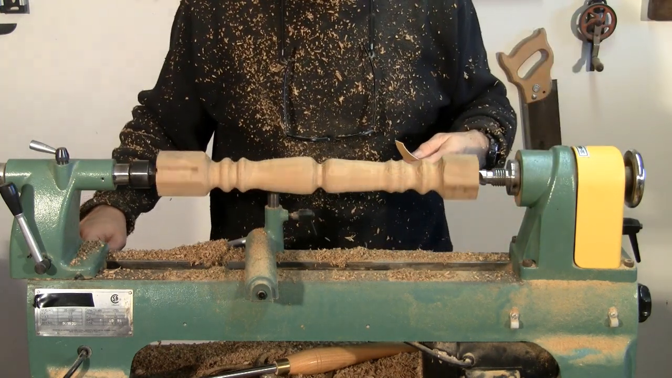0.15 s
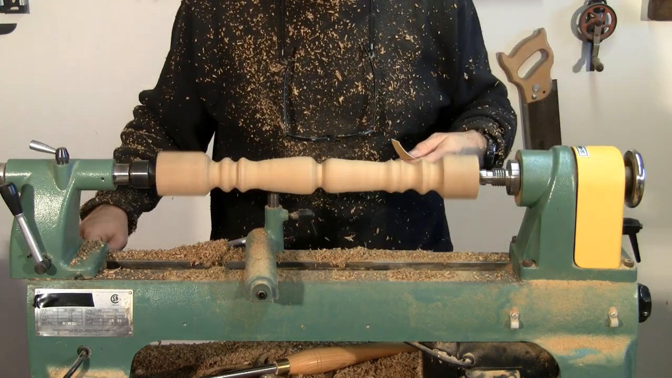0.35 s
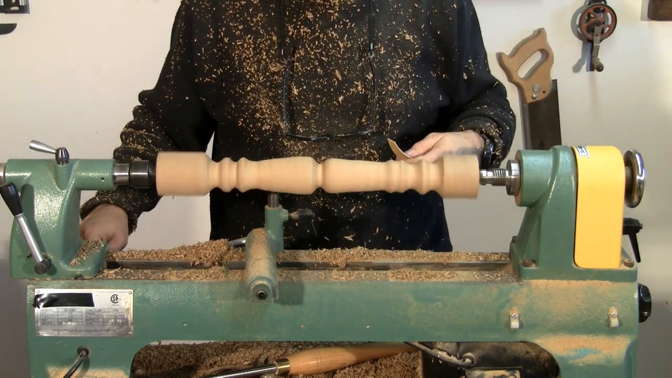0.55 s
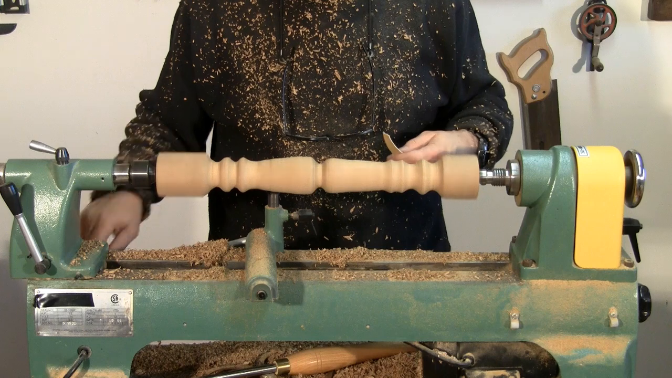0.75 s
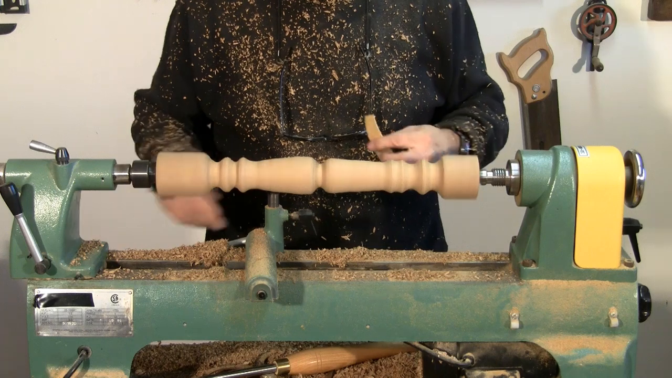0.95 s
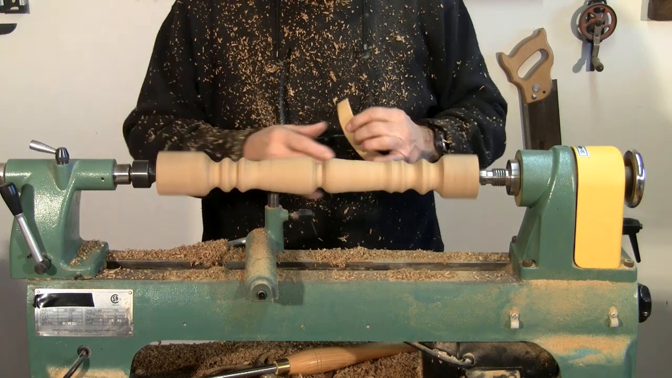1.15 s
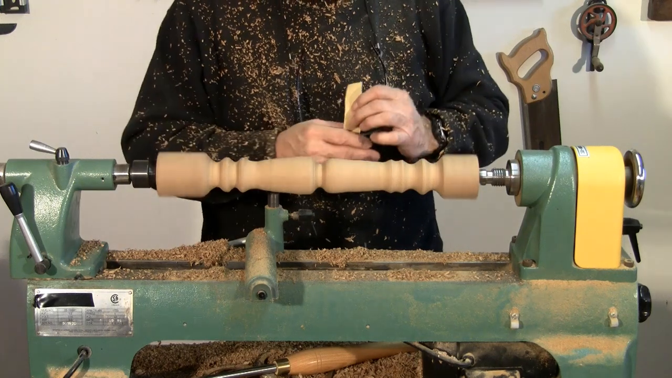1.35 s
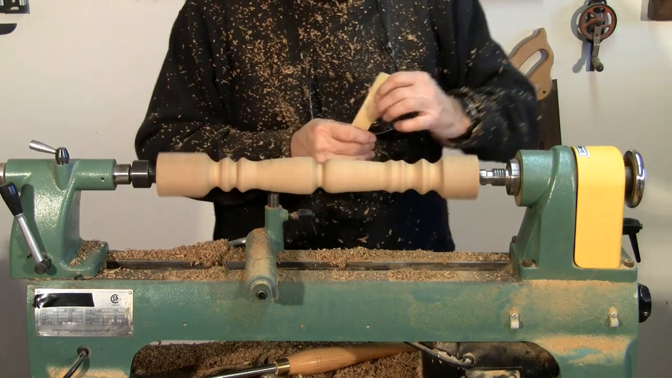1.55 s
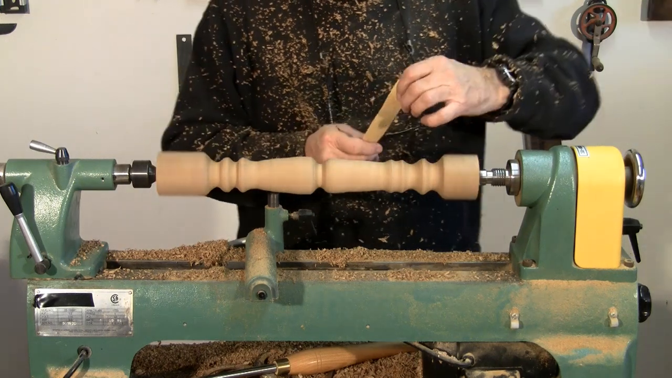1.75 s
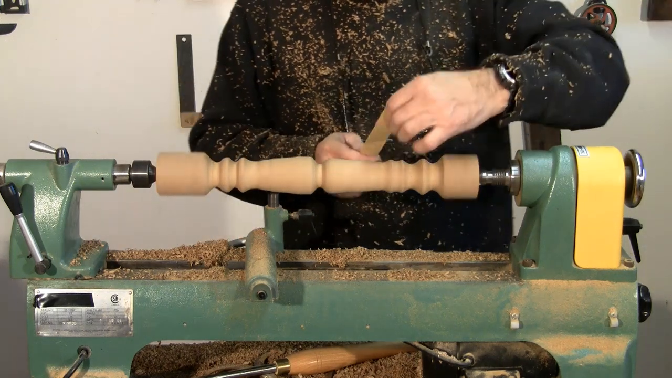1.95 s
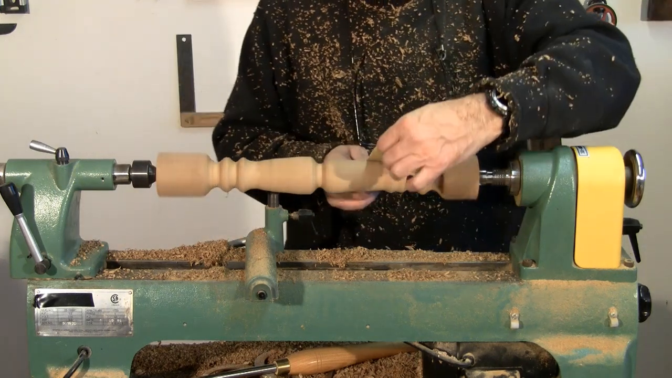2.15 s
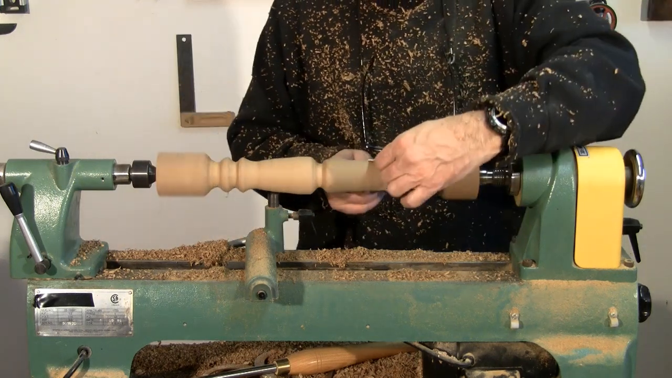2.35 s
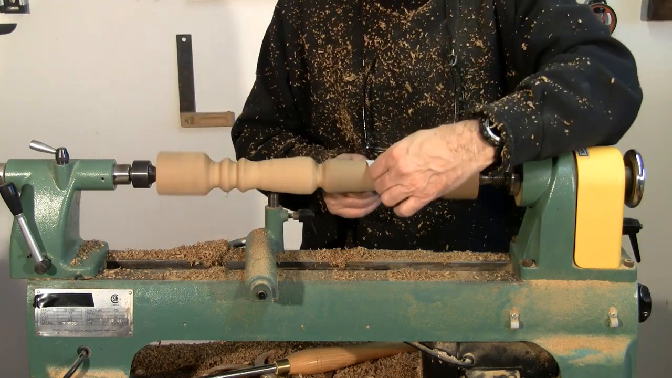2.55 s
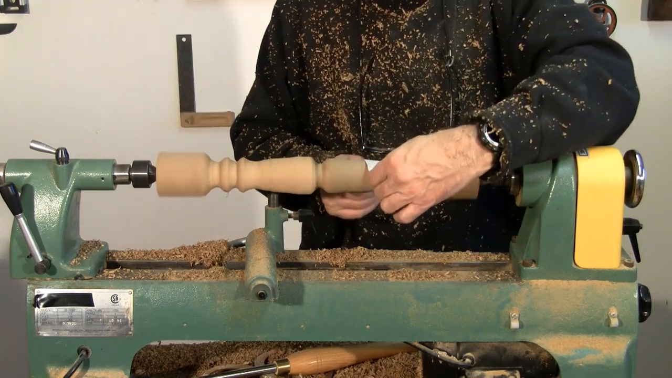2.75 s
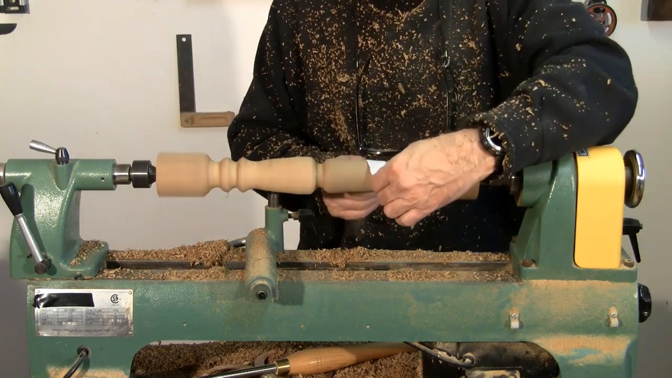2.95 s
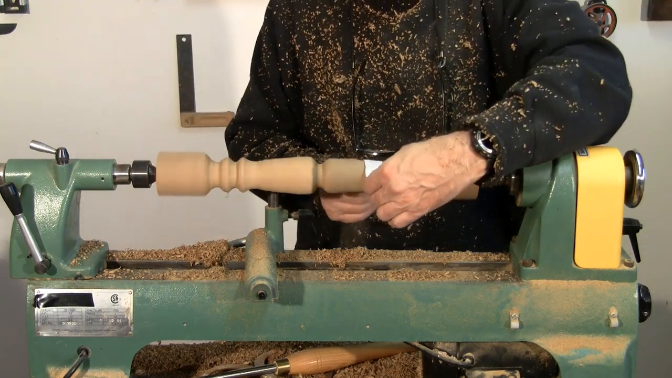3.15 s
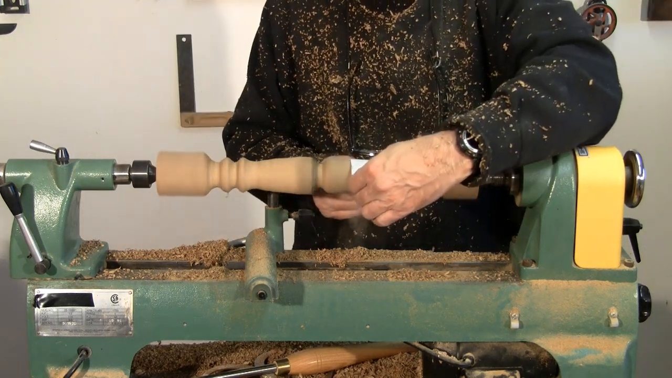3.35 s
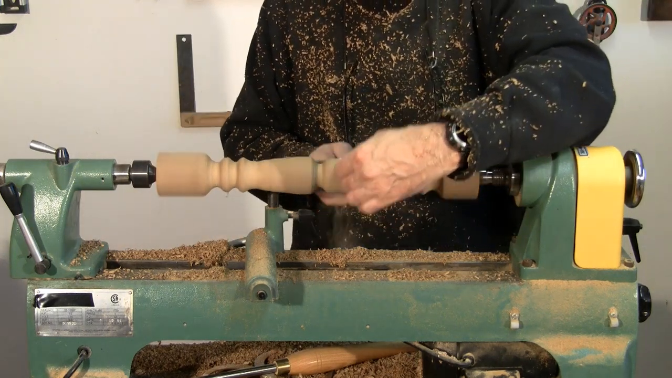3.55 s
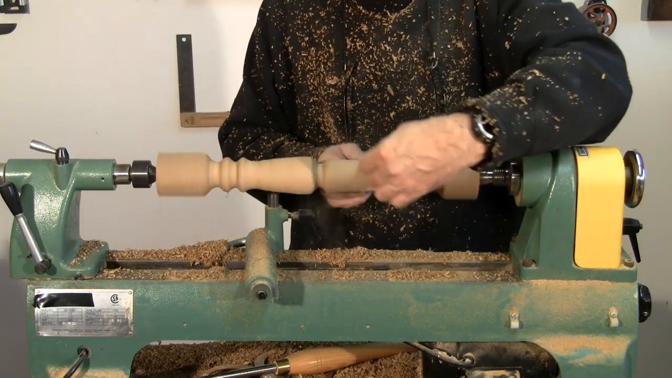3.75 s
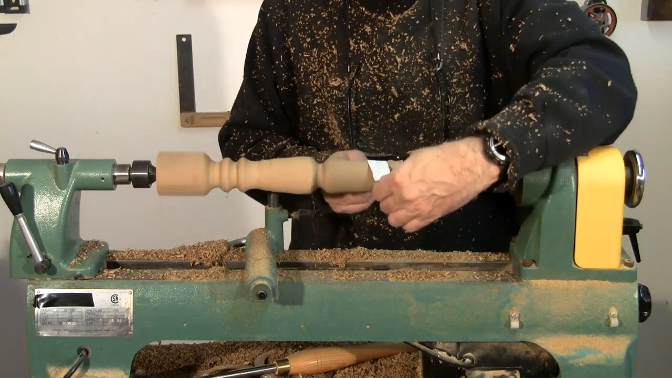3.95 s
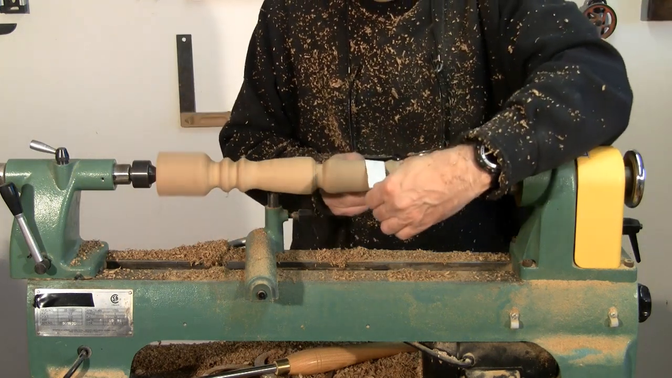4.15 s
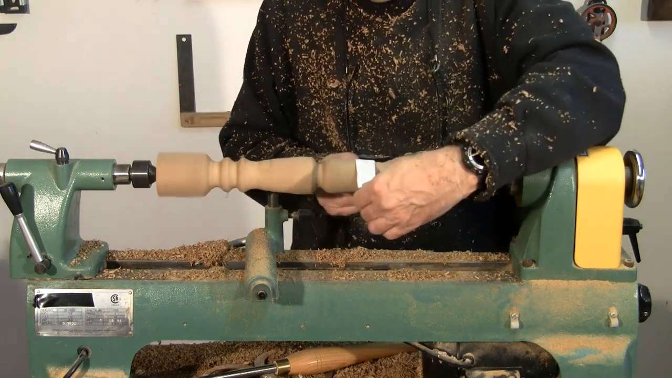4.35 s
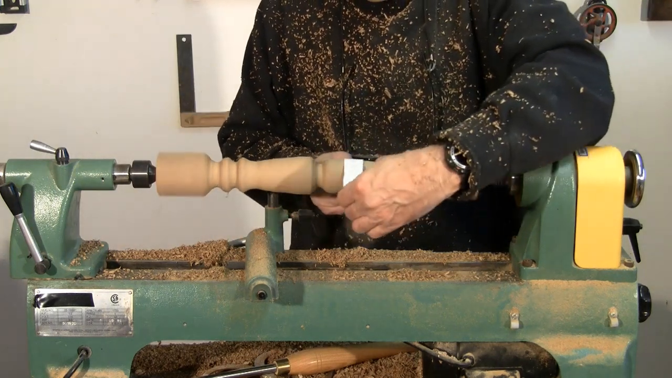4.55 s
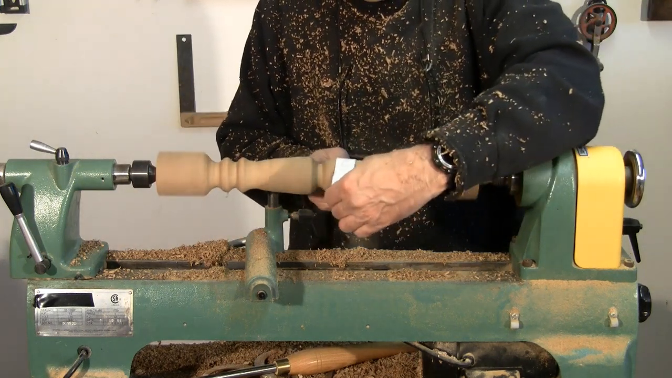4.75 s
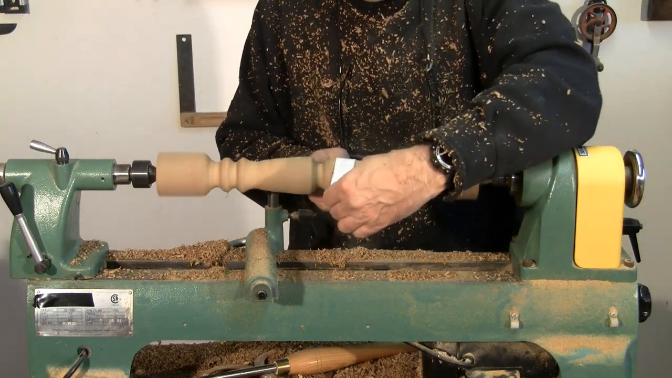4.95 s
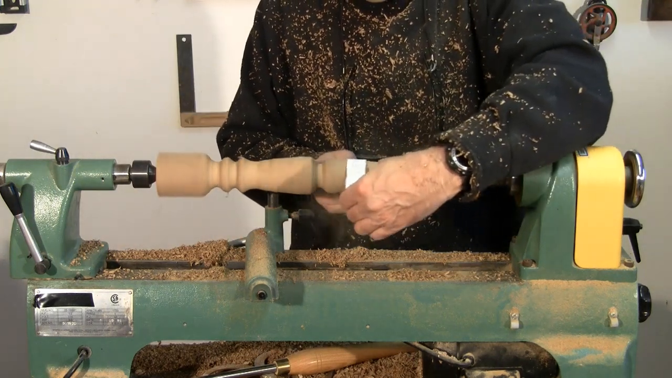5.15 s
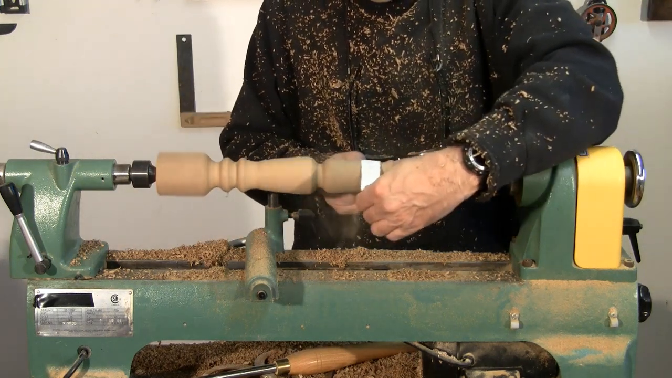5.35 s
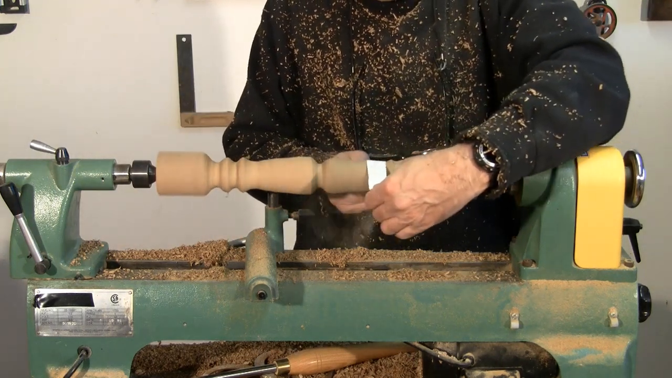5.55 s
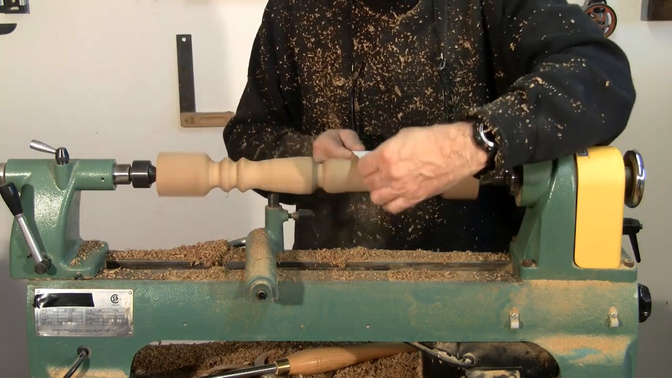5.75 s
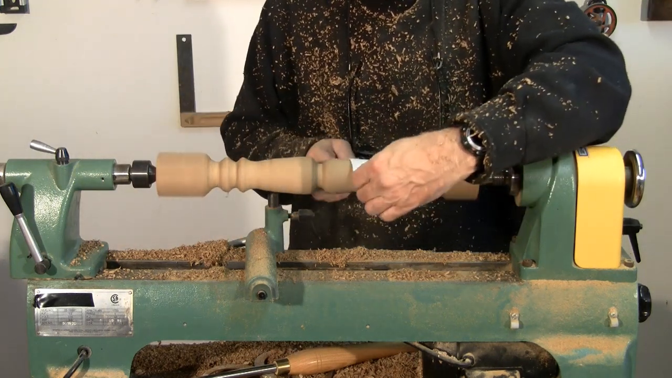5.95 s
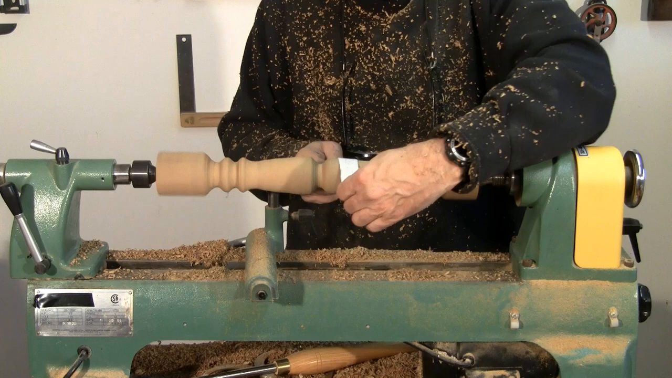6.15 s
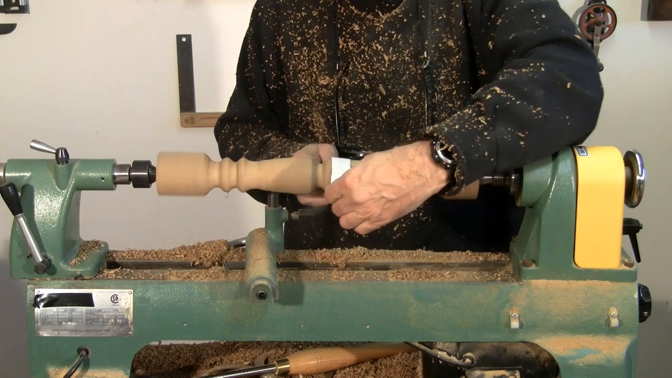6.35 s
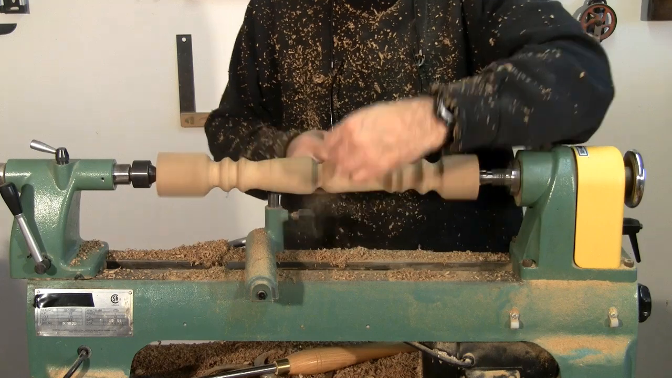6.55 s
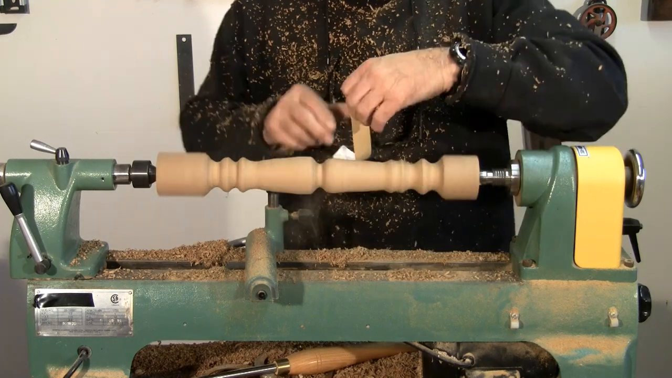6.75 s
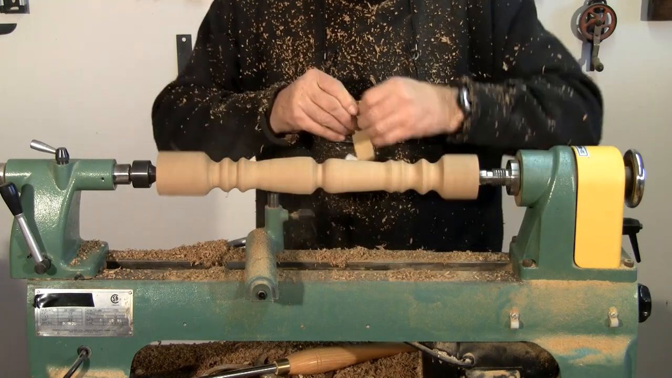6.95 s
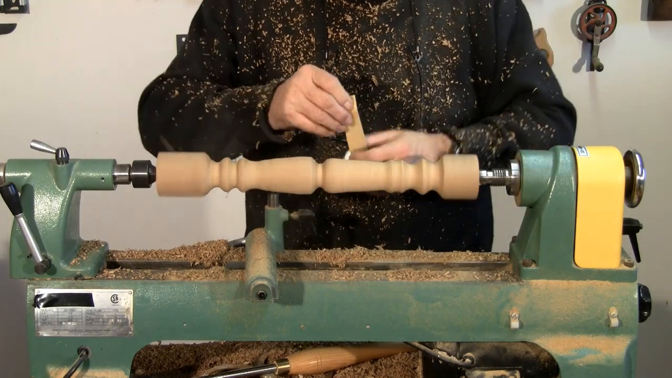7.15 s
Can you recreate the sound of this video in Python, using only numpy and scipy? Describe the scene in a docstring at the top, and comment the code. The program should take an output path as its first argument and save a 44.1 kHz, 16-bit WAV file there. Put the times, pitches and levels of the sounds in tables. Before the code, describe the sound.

A wood lathe clicks on and whines steadily while sandpaper hisses against the spinning wood in three loud passes.

```python
"""A switch snaps, close by in a small, quiet workshop, and a wood lathe runs up: the motor whines and
the belt throbs in the cast frame. Sandpaper is held to the spinning column in three passes; the grit
hisses, swelling once a turn, and the load slows the motor. One microphone hears it all, and the
recorder's gain control holds the loud passes down, so the motor sinks under them."""
import sys
import numpy as np
from scipy import signal
from scipy.io import wavfile
from scipy.ndimage import uniform_filter1d

SR = 44100
rng = np.random.default_rng(int(sys.argv[2]) if len(sys.argv) > 2 else 0)


def inscribe(sig):
    """Save sig as 16-bit PCM at rate SR to the path in sys.argv[1].

    A 1-D sig is mono; a 2-D sig holds one channel per row.
    Samples are clipped to [-1, 1] before scaling.
    """
    pcm = np.round(np.clip(np.atleast_2d(sig).T, -1, 1) * 32767)
    wavfile.write(sys.argv[1], SR, pcm.astype(np.int16))


N = 317323

# Room tone. Each row: frequency in Hz, relative density in dB.
AIR_SPECTRUM = [(18, -41), (30, -14), (70, -9), (99, -8.5), (296, -11), (708, -25), (782, -25),
                (6650, -29.5), (11500, -27.5), (15000, -65), (22000, -120)]
# Switch contacts. Each row: start in seconds, relative level in dB.
SWITCH_CONTACTS = [(0.223, -29), (0.2268, -25), (0.251, -35), (0.264, -40)]
# Ring of the switch box. Each row: frequency in Hz, relative level in dB, seconds to fall 60 dB.
BOX_MODES = [(915, -12, .04), (1660, 1, .03), (1880, 0, .03), (2400, 3, .03), (2520, 4, .03),
             (2750, -5, .02), (5700, -12, .006)]
# The run-up. Each row: time in seconds, then whine and frame in dB against their running levels.
RUN_UP = [(0.228, -60, -48), (0.24, -28, -19), (0.3, -26, -14), (0.33, -15, -3), (0.37, -13, 2),
          (0.404, 2, 2), (0.45, 2, 0)]
# The running motor. Each row: time in seconds, then 6th order, 8th order, belt rattle and depth of the
# slip beat, all in relative dB. An order is a multiple of the motor's pulse rate.
MOTOR_LEVELS = [(.454,-28.5,-34.5,-30.5,-13),(.8,-27.5,-35.5,-30,-5),(1.08,-29,-32.5,-29.5,-8),(1.25,-27,-31.5,-31.5,-1.5),(1.45,-28.5,-31,-29,0.5),(1.846,-29.5,-34,-26.5,0),(2.095,-27,-35,-30,1),(2.215,-30.5,-31,-26.5,0),(2.305,-26,-31.5,-34,-5),(2.629,-25.5,-35,-33,-9),(2.839,-23.5,-34,-24.5,-11),(3.05,-25,-34.5,-31.5,-16),(3.27,-20.5,-38,-26.5,-12),(3.48,-22.5,-40,-25.5,-9),(3.707,-26.5,-29,-28.5,-1),(4.126,-26.5,-34.5,-29,-12),(4.33,-22.5,-43,-27,-8),(4.6,-23.5,-40,-30,-10),(4.9,-24,-38,-25.5,-7),(5.14,-22.5,-31,-23.5,-11),(5.3,-22.5,-37,-28,-2),(5.5,-21,-39,-28,-7),(5.827,-27.5,-32,-34,-7),(6.1,-25.5,-30,-26.5,-6),(6.38,-25,-39,-27,-7),(6.54,-23.5,-36,-23.5,-1),(6.765,-28,-34.5,-29,-5),(7.189,-29,-31.5,-28,-1)]
# The whine, pulled down by the load. Each row: time in seconds, pitch of the 6th order in Hz.
WHINE_PITCH = [(0.35, 683.0), (0.54, 689.6), (2.17, 689.5), (3.41, 685.4), (3.85, 689.8), (4.32, 686.0),
               (5.54, 685.9), (6.03, 689.8), (6.48, 685.9), (6.78, 689.8), (7.1, 689.4)]
# Tones one slip beat off an order. Each row: order, side (-1 below, 1 above), level in dB against
# the order at a beat depth of 0 dB, starting phase in turns.
SLIP_TONES = [(6, -1, -8.5, .55), (8, 1, -2.5, -0.093), (8, -1, -11, 0.67), (4, 1, -11, -0.017),
              (4, -1, -6.5, 0.11)]
# Faint orders. Each row: order, level in dB against the frame's base level.
WEAK_ORDERS = [(5, -4.5), (7, -4), (9, -3), (10, -16), (13, -13)]
# Mains and bearings. Each row: frequency in Hz, level in dB against the frame's base level.
HUM_TONES = [(60, -30.5), (120, -22), (140, -22.5), (155, -17), (165.5, -13.5), (219, -16.5), (240, -6.5),
             (261.3, -11), (340, -12), (382, -15.5), (408, -17.5), (613.7, -7.5), (741.3, -7)]
# Frame rumble. Each row: frequency in Hz, relative density in dB.
RUMBLE_SPECTRUM = [(18, -73), (30, -40), (81, -45), (189, -15.5), (240, -9.5), (301, -27), (452, -6),
                   (526, -13), (630, -11.5), (689, -2.5), (755, -6), (851, -13.5), (918, -5.5),
                   (1100, -9.5), (1430, -43), (2420, -120)]
# Belt rattle. Each row: frequency in Hz, relative density in dB.
RATTLE_SPECTRUM = [(530, -40), (900, -4.5), (1090, -7.5), (1370, -4), (1480, -9.5), (1990, -6.5),
                   (2170, -12.5), (2470, -15), (3850, -24.5), (4670, -23.5), (5320, -28), (11100, -50.5),
                   (12000, -103), (15600, -83), (22000, -120)]
# Ring of frame and guard. Each row: frequency in Hz, width in Hz, relative level in dB.
FRAME_MODES = [(679, 16, -5), (815, 29, -8), (841, 15, -10), (938, 13, -9), (1092, 8.9, -21),
               (1452, 5.6, -8.5), (1547, 7.2, -8.5), (1677, 25, -9.5), (1786, 17, -17), (1930, 10, -13.5),
               (2380, 25, -13), (3140, 16, -22), (4160, 110, -33), (4670, 160, -17)]
# The rattle's swell on each belt lap. Each row: frequency in Hz, depth in dB.
BELT_THROB = [(900, 1.5), (1200, 1.6), (1500, 4.5), (1900, 2), (3000, 1.5), (5000, 2.3), (8000, -3)]
# Sanding, one list a pass. Each row: time in seconds, then hiss, treble shift and low scrape in dB.
SANDING_PASSES = [
    [(2.275,-30,4,-2),(2.449,-29.5,0.5,3.5),(2.529,-15,-3,1.5),(2.64,-10.5,-3,-3.5),(2.8,-13.5,-3,-1.5),(2.958,-10.5,-2.5,-4),(3.063,-12,-0.5,-2),(3.263,-12,-0.5,2.5),(3.412,-6.5,3.3,-1.8),(3.522,-5,.7,1.7),(3.587,-8,-3.5,0.5),(3.756,-43.5,1,-1)],
    [(3.871,-27,6.8,-1),(3.941,-26.5,-1.5,0),(4.041,-16.5,-6.5,1.5),(4.18,-10.5,-1,-0.5),(4.33,-12.5,-.5,2.8),(4.47,-10.5,5.5,0),(4.62,-7.5,2.5,-0.5),(4.724,-8.5,-3,3),(4.884,-6.5,1,0.5),(5.044,-6,-0.5,-3.5),(5.143,-10,0.5,5.5),(5.28,-7.5,2,-1),(5.4,-11,2.5,-0.5),(5.502,-13.5,-1.5,0.5),(5.607,-15,-.9,6),(5.71,-15,0,-1.5),(5.782,-24.5,3,-3),(5.857,-43,4,-7)],
    [(5.991,-30,4.5,0.5),(6.051,-19.5,.1,-3),(6.126,-15,-.5,-4),(6.261,-9.5,-4.5,1.5),(6.4,-7,0,-3.5),(6.52,-12,3.5,-4),(6.58,-12.5,1,-1),(6.665,-37.5,4,-4),(6.74,-50,2,-0.5)],
]
# Grit, before each of its five ranges is levelled. Each row: frequency in Hz, relative density in dB.
GRIT_SPECTRUM = [(1290, -32), (2200, -20), (2500, -23.5), (2750, -18), (3740, -16), (4020, -13),
                 (4870, -12), (5090, -9.5), (6630, -7), (7330, -2.5), (8650, 1), (11400, -6), (12200, -18),
                 (15900, -48), (22000, -120)]
# Colour of those ranges, low to high. Each row: level in dB against the hiss at a firm press, then
# dB gained per dB of press, of treble shift and of low scrape.
HISS_COLOUR = [(-12, -0.35, 0.22, 0.83), (-8, -0.39, -.51, 0.36), (-4.5, -0.13, -0.5, -.14),
               (-3.5, 0.13, 0.19, 0.04), (-8.3, 0.1755, 1.18, -0.1)]
# Bite of the hiss at 4.5-6.3 kHz. Each row: time in seconds, extra level in dB.
HISS_BITE = [(2.3, 0.5), (2.5, 2.5), (2.7, 0.5), (3.0, 0), (3.22, 2.5), (3.4, 0.5), (3.6, -1), (4.2, -0.5),
             (4.5, -0.5), (4.75, 1.5), (5.0, 1), (5.17, 3), (5.3, -0.5), (5.6, 0.5), (6.1, -1),
             (6.35, -1.5), (6.58, 0.5), (6.7, -1)]

SLIP_HZ, SLIP_PER_SAG = 5.35, 0.064   # base beat rate, Hz added per Hz of sag
SLIP_REFERENCE_HZ = 691.7   # pitch just above the unloaded whine, from which the beat quickens
WOBBLE_HZ, BELT_HZ, SPINDLE_HZ = 12.72, 11.365, 42.68   # beats, belt laps and column turns a second


def from_db(db):
    """Decibels to gain."""
    return 10 ** (np.asarray(db) / 20)


def rms_one(x):
    """Scale to unit rms."""
    return x / np.sqrt(np.mean(x ** 2) + 1e-20)


def in_time(rows):
    """Rows that begin with seconds, as one curve for each further column."""
    times, *columns = np.transpose(rows)
    return [np.interp(np.arange(N) / SR, times, column) for column in columns]


def drift(rate_hz):
    """A slow random wander of unit rms."""
    pole = np.exp(-80 * np.pi * rate_hz / SR)   # one step every 40 samples
    slow = signal.lfilter([1], [1, -2 * pole, pole * pole], rng.standard_normal(N // 40 + 2002))[2000:]
    return np.interp(np.arange(N) / 40, np.arange(len(slow)), rms_one(slow))


def spin(hz, start_turns):
    """Angle in radians of a steady rotation."""
    return 2 * np.pi * (hz * np.arange(N) / SR + start_turns)


def grains(per_s, spread_db):
    """Two streams of noise with scattered samples scaled: positive spread makes uneven clicks."""
    sizes = from_db(spread_db * np.minimum(rng.exponential(1, (2, N)), 4))
    return rms_one(rng.standard_normal((2, N)) * (1 + sizes * (rng.random((2, N)) < per_s / SR)))


def bandpass(x, low_hz, high_hz):
    """A gentle band filter."""
    return signal.sosfilt(signal.butter(2, [low_hz, high_hz], "band", fs=SR, output="sos"), x)


def bands(streams, spectrum, count, flicker_db, flicker_hz):
    """Yield (Hz, sound) for narrow bands cut from two streams in turn, each flickering on its own."""
    hz_points, db_points = np.transpose(spectrum)
    edges = np.geomspace(max(hz_points[0], 20), min(hz_points[-1], 13000), count + 1)
    for k, (low, high) in enumerate(zip(edges, edges[1:])):
        hz = np.sqrt(low * high)
        level_db = np.interp(np.log(hz), np.log(hz_points), db_points) + flicker_db * drift(flicker_hz)
        yield hz, from_db(level_db) * bandpass(streams[k % 2], low, high)


def resonance(x, hz, width_hz):
    """A two-pole resonance at unit rms."""
    pole = np.exp(-np.pi * width_hz / SR)
    feedback = [1, -2 * pole * np.cos(2 * np.pi * hz / SR), pole * pole]
    return rms_one(signal.lfilter([1, 0, -1], feedback, x))


def workshop(direct, t60_s=0.13, room_db=-4):
    """The direct sound reaches the microphone first; bed, bench and walls answer from 1 ms on."""
    t = np.arange(SR // 4) / SR
    echoes = rng.standard_normal(len(t)) * from_db(-60 * t / t60_s) * (t > .001)
    return direct + from_db(room_db) * signal.fftconvolve(direct, echoes / np.linalg.norm(echoes))[:N]


def room_tone(level_db=-57):
    """Faint, slowly shifting workshop air around the microphone."""
    air = bands(rng.standard_normal((2, N)), AIR_SPECTRUM, count=18, flicker_db=3.5, flicker_hz=0.82)
    return from_db(level_db) * rms_one(sum(band for _, band in air))


def switch():
    """Each contact is a short rattle that rings the small switch box, with no bass and little top."""
    clicks = np.zeros(N) + 1e-18
    decay = np.exp(-np.arange(400) / SR / 0.0023)
    for start_s, level_db in SWITCH_CONTACTS:
        at = round(start_s * SR)
        clicks[at:at + 400] += from_db(level_db) * rng.standard_normal(400) * decay
    snap = from_db(5.5) * clicks
    for hz, level_db, t60_s in BOX_MODES:
        pole, step = from_db(-60 / (t60_s * SR)), 2 * np.pi * hz / SR
        ring = signal.lfilter([0, np.sin(step)], [1, -2 * pole * np.cos(step), pole * pole], clicks)
        snap += from_db(level_db - 21.5) * ring
    return bandpass(snap, 900, 8500)


def slip_beat(sixth_hz):
    """Angle of the beat between field and rotor; it quickens as the whine sags."""
    return 2 * np.pi * np.cumsum(SLIP_HZ + SLIP_PER_SAG * (SLIP_REFERENCE_HZ - sixth_hz)) / SR


def motor_whine(sixth_hz, slip, sixth_db, eighth_db, beat_db, frame_db):
    """Wavering orders of the motor's pulse rate beat with slip tones, over mains and bearing hum."""
    angle = 2 * np.pi * np.cumsum(sixth_hz / 6) / SR
    order_db = {4: sixth_db - 17, 6: sixth_db, 8: eighth_db}
    # A companion tone just under the 6th order beats with it.
    tones = from_db(sixth_db - 17) * np.sin(6 * angle - spin(WOBBLE_HZ, 0.69))
    for order, level_db in order_db.items():
        tones += from_db(level_db + 1.13 * drift(3.2)) * np.sin(order * angle)
    for order, side, level_db, start_turns in SLIP_TONES:
        phase = order * angle + side * slip + 2 * np.pi * start_turns
        tones += from_db(order_db[order] + level_db + beat_db) * np.sin(phase)
    for order, level_db in WEAK_ORDERS:
        gain = from_db(frame_db + level_db + 3.6 * drift(2.7))
        tones += gain * np.sin(order * angle + rng.uniform(0, 2 * np.pi))
    for hz, level_db in HUM_TONES:
        tones += from_db(frame_db + level_db + 2.0 * drift(5.6)) * np.sin(spin(hz, rng.random()))
    return np.sqrt(2) * tones


def frame_rumble(frame_db):
    """The cast frame rumbles under the running motor."""
    noise = rng.standard_normal((2, N))
    rumble = bands(noise, RUMBLE_SPECTRUM, count=20, flicker_db=-0.5, flicker_hz=5.8)
    return from_db(frame_db + 4.5) * rms_one(sum(band for _, band in rumble))


def belt_rattle(level_db):
    """Frame and guard rattle, swelling as the belt joint passes a pulley, most in the middle pitches."""
    lap = spin(BELT_HZ, -.25)
    swell = np.cos(lap) + 0.05 * np.sin(2 * lap) + 0.44 * drift(12)
    knocks = grains(per_s=390, spread_db=-3.5)
    parts = list(bands(knocks, RATTLE_SPECTRUM, count=30, flicker_db=1.56, flicker_hz=2.1))
    rattle_rms = np.std(sum(band for _, band in parts))
    for k, (hz, width_hz, mode_db) in enumerate(FRAME_MODES):
        ring = resonance(knocks[k % 2, ::-1], hz, width_hz)
        parts.append((hz, rattle_rms * from_db(mode_db) * ring))
    middle, treble = np.zeros((2, N))
    for hz, part in parts:
        throb_db = np.interp(hz, *np.transpose(BELT_THROB)) * swell
        register = middle if hz < 2600 else treble
        register += part * from_db(throb_db) / rattle_rms
    treble_db = level_db - 0.32 * np.maximum(level_db + 34, 0) + 1.5   # follows the swings only in part
    return from_db(level_db - 1.38) * middle + from_db(treble_db) * workshop(treble)


def sanding(touch_s=0.046, lift_s=0.097, firm_db=-16):
    """Grit tears fibres; the column is not quite round, so the hiss swells once a turn."""
    strokes = []
    for rows in SANDING_PASSES:
        strokes += [(rows[0][0] - touch_s, -80, 0, 0), *rows, (rows[-1][0] + lift_s, -80, 0, 0)]
    hiss_db, shift_db, scrape_db = in_time(strokes)
    press_db = np.maximum(hiss_db - firm_db, -22)   # a firmer press is brighter
    turn = spin(SPINDLE_HZ, -.56)
    turn_db = 1.52 * np.cos(turn) + .5 * np.sin(2 * turn)
    contact = from_db(turn_db + 0.97 * drift(32) + 0.5 * drift(220) + 0.4 * drift(18))
    grit = [workshop(stream) for stream in grains(per_s=1200, spread_db=5.5) * contact]
    # Narrow resonances of wood and paper wax and wane as the hand slides along.
    ranges = np.zeros((5, N))
    for hz, band in bands(grit, GRIT_SPECTRUM, count=76, flicker_db=2.0, flicker_hz=4.0):
        ranges[np.searchsorted([4500, 6300, 8000, 9500], hz)] += band
    ranges /= np.sqrt(uniform_filter1d(ranges ** 2, size=13000))   # so the waxing only recolours a range
    ranges[1] *= from_db(in_time(HISS_BITE)[0])
    hiss = np.zeros(N)
    for (base_db, per_press, per_shift, per_scrape), sound in zip(HISS_COLOUR, ranges):
        colour_db = base_db + per_press * press_db + per_shift * shift_db + per_scrape * scrape_db
        hiss += from_db(hiss_db + colour_db) * sound
    return hiss


def scene():
    """Room tone, switch, lathe and paper at one microphone, the same on both channels."""
    whine_rise_db, frame_rise_db = in_time(RUN_UP)
    sixth_db, eighth_db, rattle_db, beat_db = in_time(MOTOR_LEVELS)
    sixth_hz, = in_time(WHINE_PITCH)
    frame_db = frame_rise_db - 38   # the frame's base level
    slip = slip_beat(sixth_hz)
    slip_swell_db = np.cos(slip + 2 * np.pi * .15)   # the rattle swings 1 dB with the slip beat
    air = room_tone()
    lathe = motor_whine(sixth_hz, slip, sixth_db + whine_rise_db, eighth_db + whine_rise_db,
                        beat_db, frame_db)
    lathe += frame_rumble(frame_db)
    lathe += belt_rattle(rattle_db + frame_rise_db + slip_swell_db)
    return np.tile(air + lathe + sanding() + workshop(switch()), (2, 1))


def record(dry):
    """The recorder turns loud sound down and recovers steadily, rounds peaks and cuts the top steeply."""
    threshold_db, hold_share, listen_s, recover_db_per_s, cutoff_hz = -15, 0.95, 0.0075, 61, 12030
    pole = np.exp(-1 / (listen_s * SR))
    power = signal.lfilter([(1 - pole) ** 2], [1, -2 * pole, pole * pole], dry[0] ** 2)
    level_db = 10 * np.log10(power + 1e-12)
    ramp_db = recover_db_per_s * np.arange(N) / SR
    peak_db = np.maximum.accumulate(level_db + ramp_db) - ramp_db
    held = dry * from_db(-hold_share * np.maximum(peak_db - threshold_db, 0))
    rounded = held / (1 + (held / .7) ** 4) ** .25
    return signal.sosfilt(signal.ellip(18, .5, 110, cutoff_hz, fs=SR, output="sos"), rounded)


dry = scene()
out = record(dry)
inscribe(out)
```